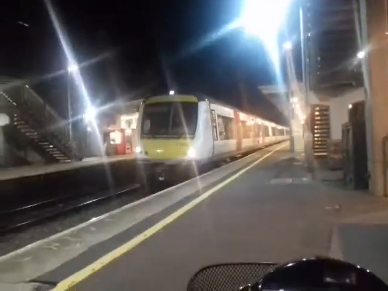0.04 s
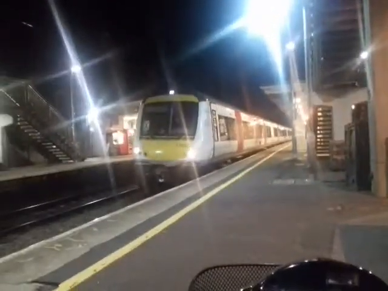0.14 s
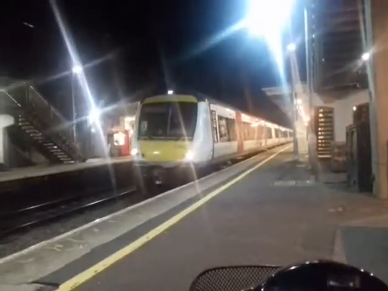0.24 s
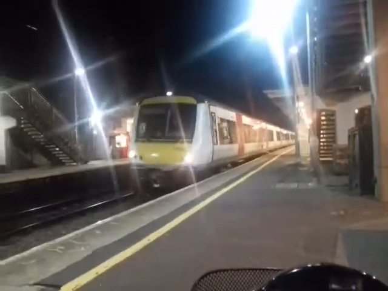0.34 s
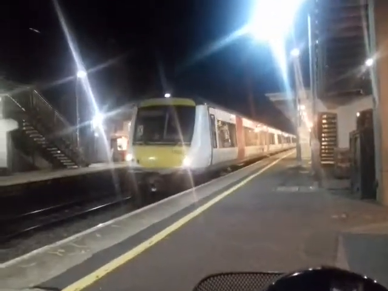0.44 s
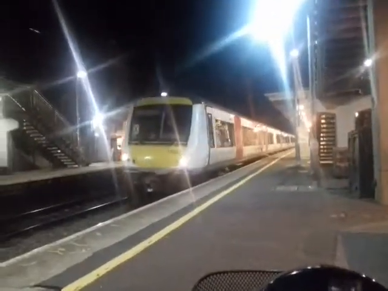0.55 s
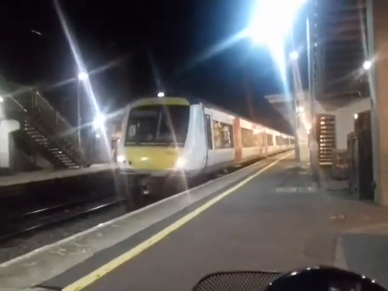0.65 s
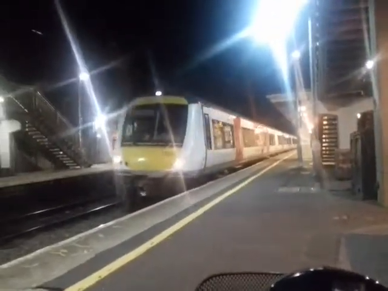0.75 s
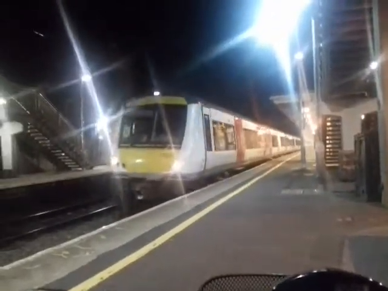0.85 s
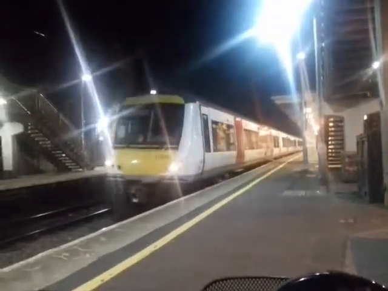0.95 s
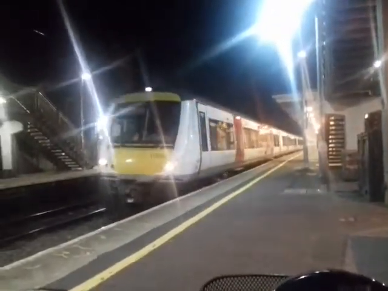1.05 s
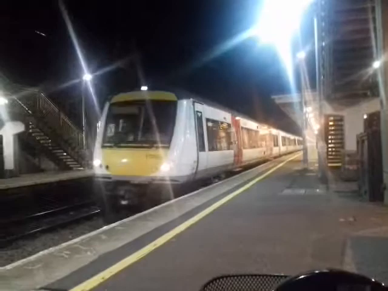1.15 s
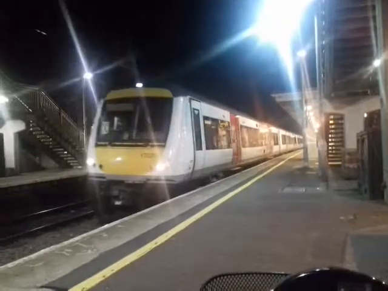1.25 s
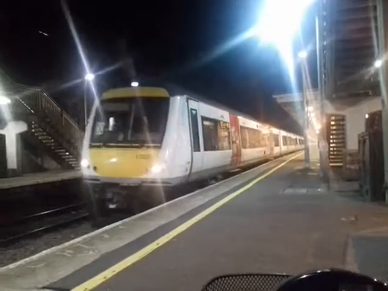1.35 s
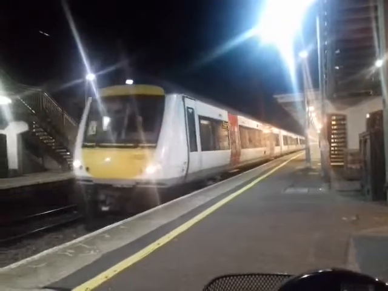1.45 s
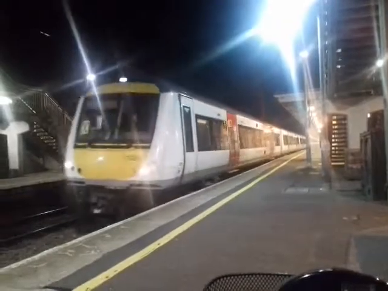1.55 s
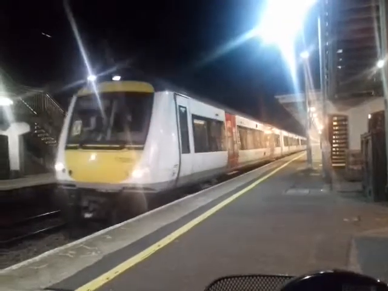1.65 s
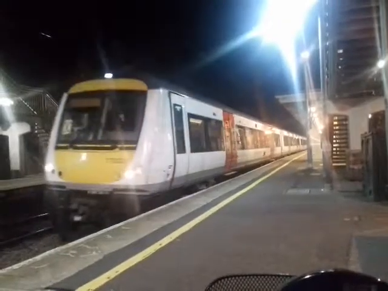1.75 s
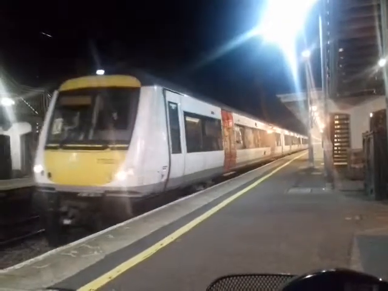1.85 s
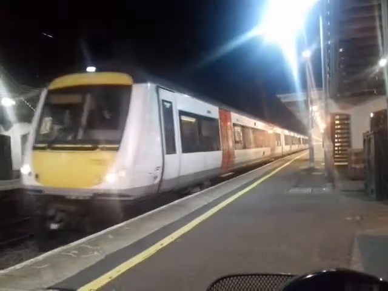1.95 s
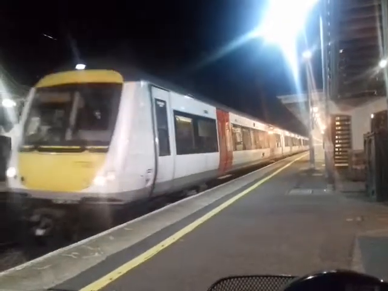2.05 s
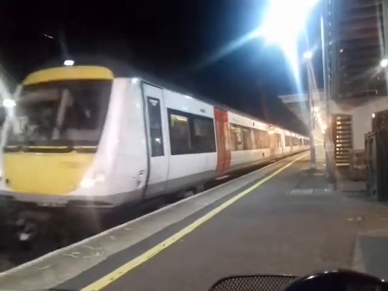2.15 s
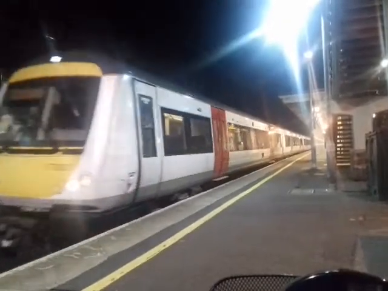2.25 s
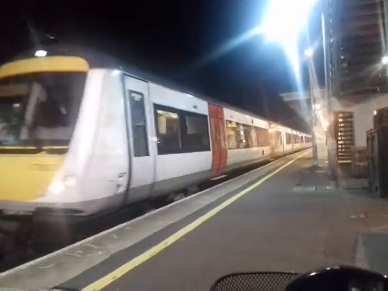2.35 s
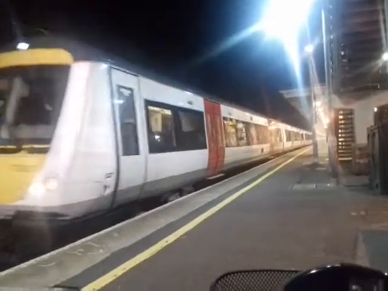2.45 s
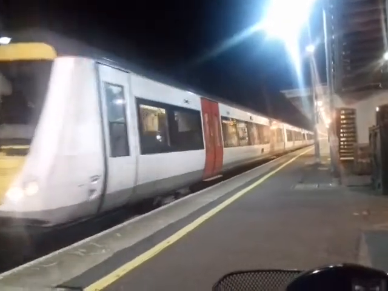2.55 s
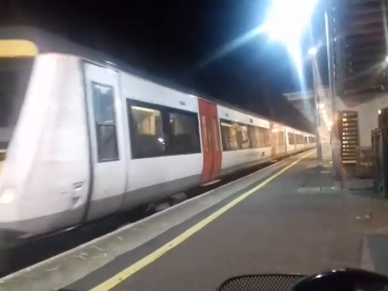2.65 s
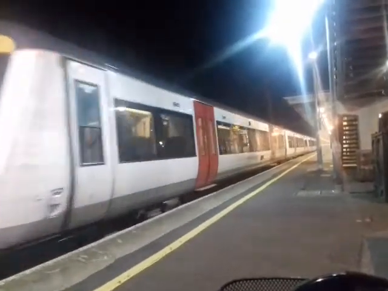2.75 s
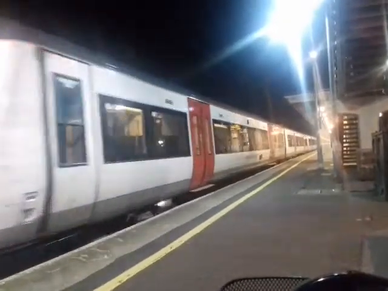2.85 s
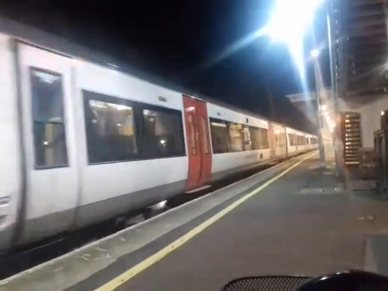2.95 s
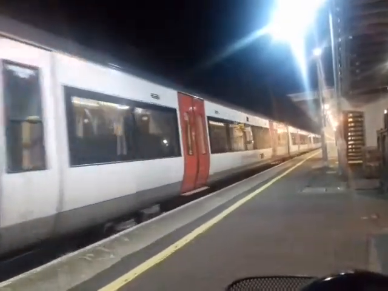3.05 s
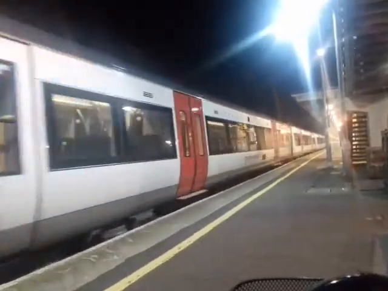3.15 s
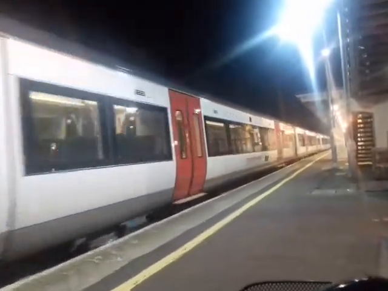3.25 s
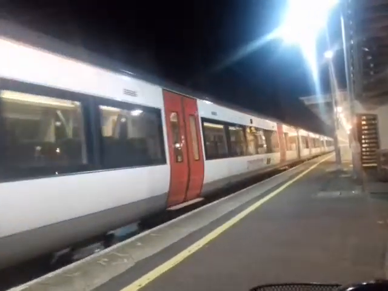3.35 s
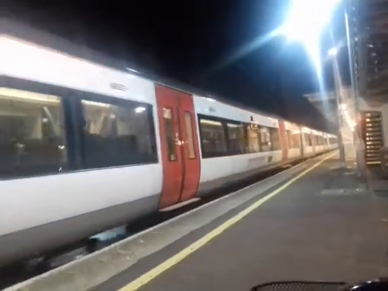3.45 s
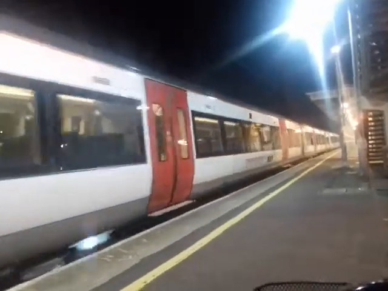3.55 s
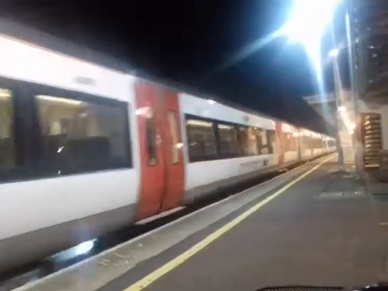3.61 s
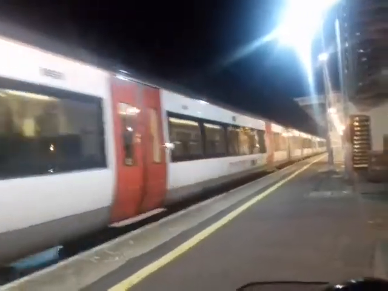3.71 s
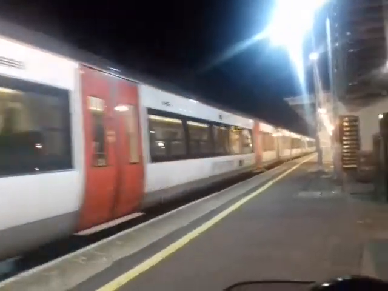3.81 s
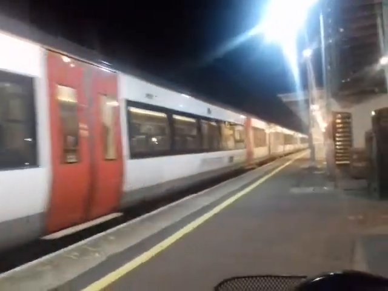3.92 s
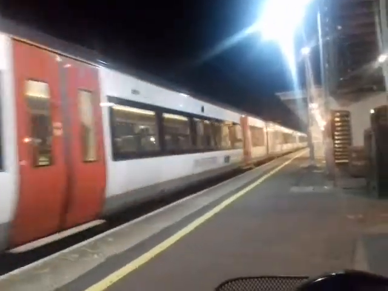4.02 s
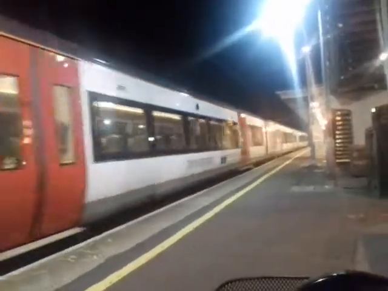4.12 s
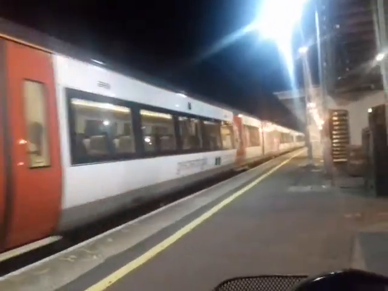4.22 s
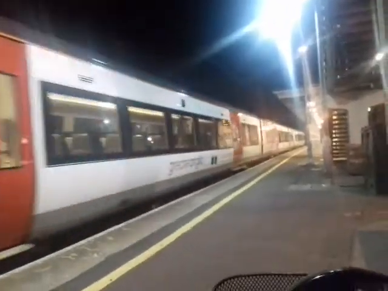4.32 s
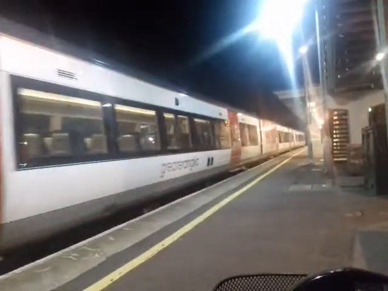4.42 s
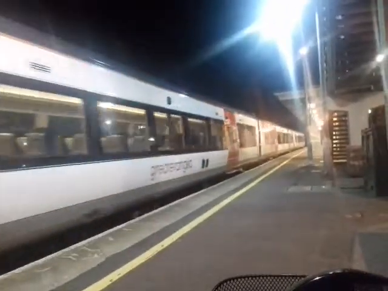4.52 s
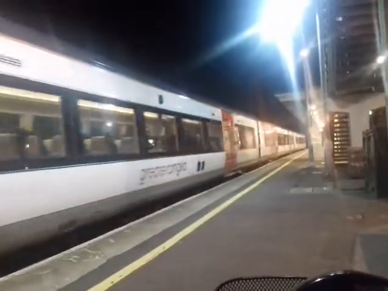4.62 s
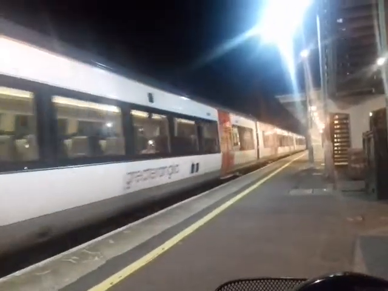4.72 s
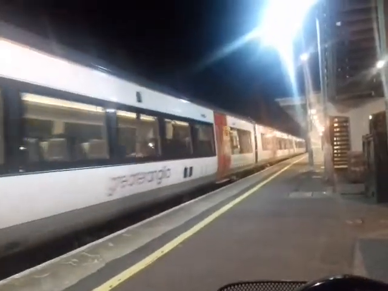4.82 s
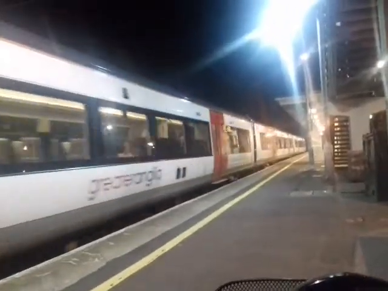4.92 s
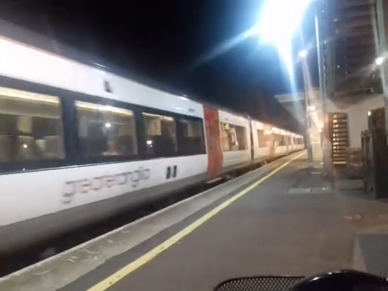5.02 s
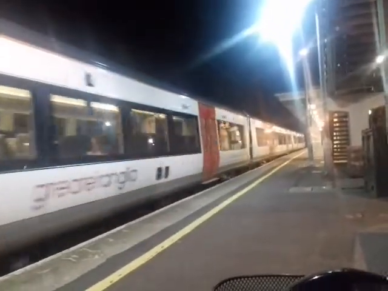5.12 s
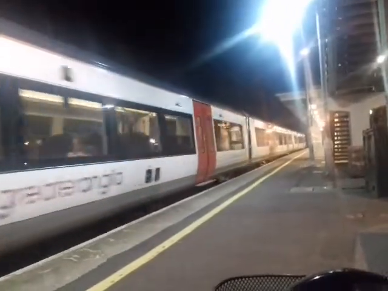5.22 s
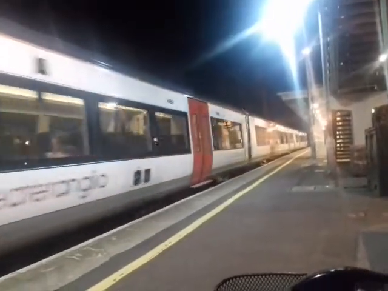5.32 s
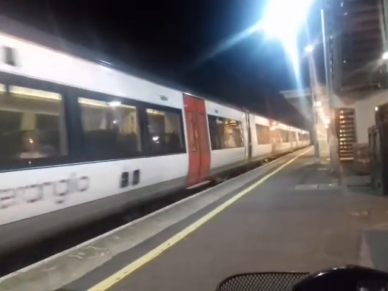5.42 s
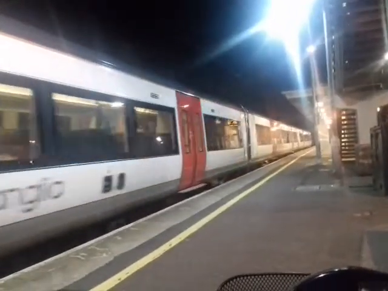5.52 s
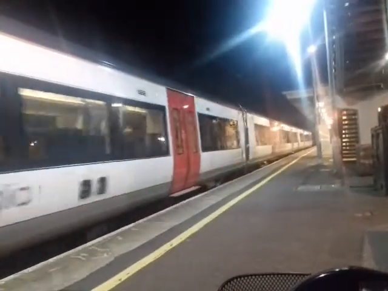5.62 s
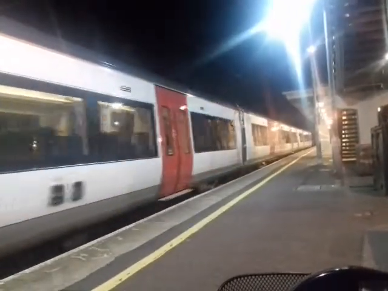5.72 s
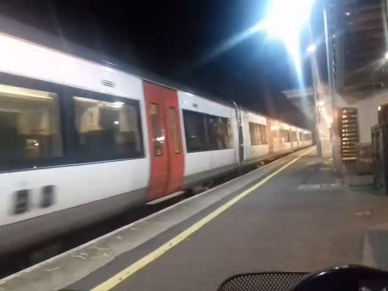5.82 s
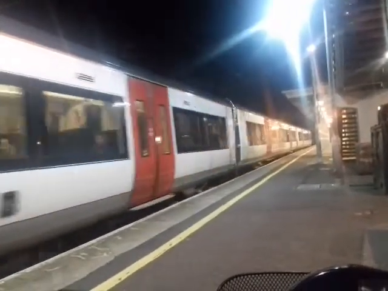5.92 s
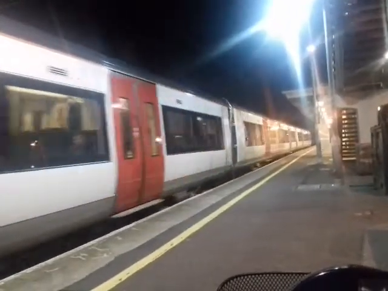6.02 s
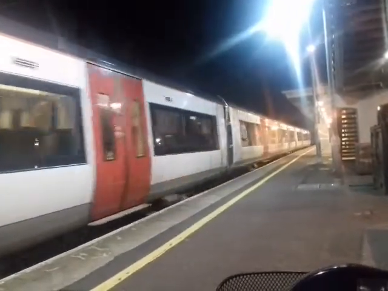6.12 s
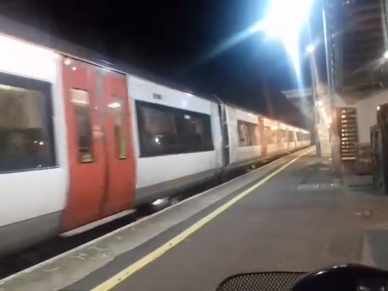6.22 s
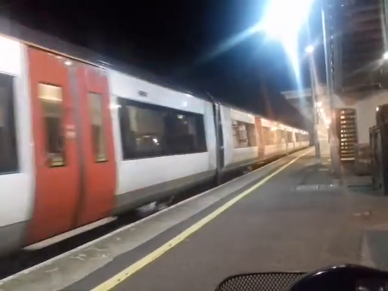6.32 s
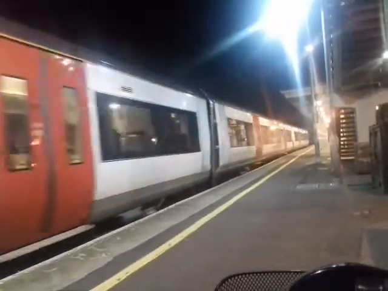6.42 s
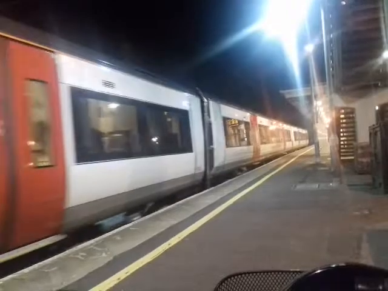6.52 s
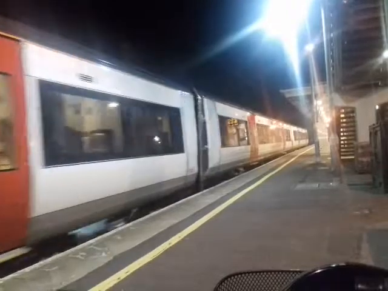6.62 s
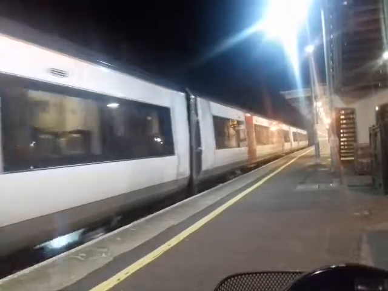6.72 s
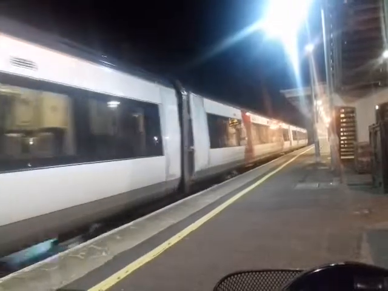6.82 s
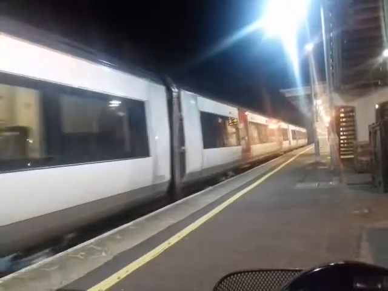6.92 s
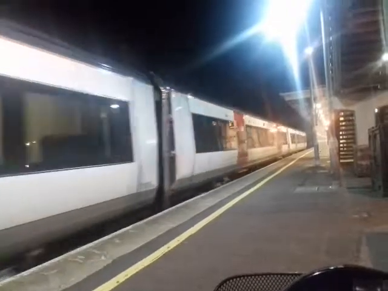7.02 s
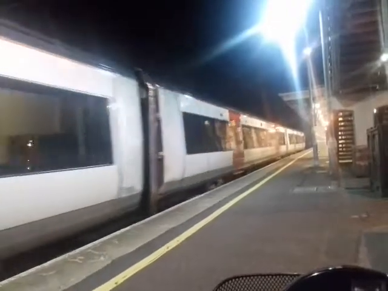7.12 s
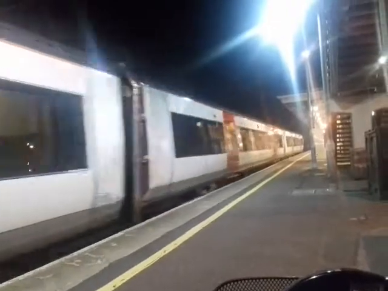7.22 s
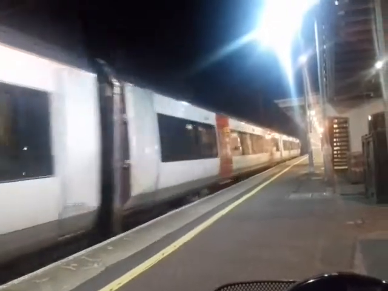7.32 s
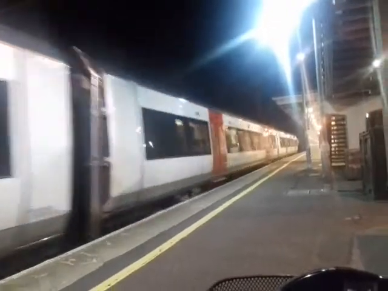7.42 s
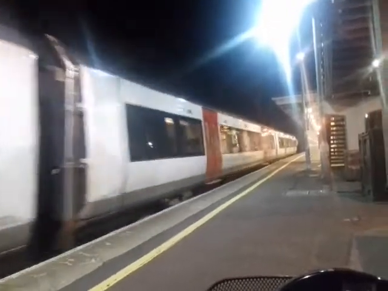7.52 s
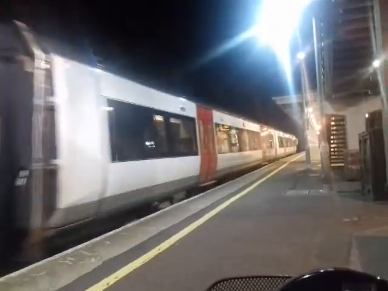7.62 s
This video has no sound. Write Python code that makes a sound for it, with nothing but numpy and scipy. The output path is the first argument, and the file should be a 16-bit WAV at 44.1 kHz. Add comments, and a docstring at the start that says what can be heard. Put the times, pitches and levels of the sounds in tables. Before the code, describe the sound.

A diesel passenger train passes close to a microphone on an open platform. From 0 s a low, wavering engine drone and distant wheel noise are heard with a bright airy hiss, which sinks, flares again around 1.3 s after two tiny ticks at about 1 s, and dies away by 2 to 3 s. From about 2.5 s a fuzzy transmission whine stands out, slowly gliding down. Rolling roar and wheel hiss thicken between 3 and 5 s as the running gear nears, and a deep fan hum swells to its fullest near 5 s. Around 6 s the exhaust boom surges in uneven pulses, and the engine comes abreast near 6.4 s, throbbing, with a thin turbo whistle above. A higher fan tone and the rear wheels' rush peak around 7.3 to 7.5 s, and the sound stops at about 7.7 s, still loud. Mono, full and rough.

```python
"""A diesel railcar train pulls out along a platform under full power, its coaches passing close by.
First come far wheel noise, engine tones, two tiny ticks and an airy hiss that sinks, flares and dies away.
Transmission and turbocharger whine as gliding tones, and running gear passes as bands of noise.
The lower fan tone swells; the six-cylinder engine draws abreast, its exhaust boom surging from about 6 s;
the upper fan tone and rear bogie peak last. Random quadrature echoes make every sustained tone waver."""
import sys
import numpy as np
from scipy import signal
from scipy.fft import rfft, irfft, next_fast_len
from scipy.io import wavfile
from scipy.ndimage import uniform_filter1d, minimum_filter1d, map_coordinates

SR = 44100
rng = np.random.default_rng(int(sys.argv[2]) if len(sys.argv) > 2 else 0)


def persist_wave(psi):
    """Save psi, clipped to +-1, as 16-bit WAV."""
    counts = np.round(np.clip(psi, -1, 1) * 32767).astype(np.int16)
    wavfile.write(sys.argv[1], SR, np.atleast_2d(counts).T)


N = 337806
TIME = np.arange(N) / SR  # s

# crankshaft speed as heard: (time [s], speed [turns/s])
SHAFT_SPEED = [(0, 24.17), (1.2, 24.25), (2.3, 24.19), (3.3, 24.12), (4.6, 24.11), (5.7, 24.06),
               (6.6, 23.94), (7.1, 23.96), (7.66, 24.02)]
# combustion rumble spectrum: (frequency [Hz], relative level [dB])
RUMBLE_SPECTRUM = [(20, -59.5), (40, -35), (65, -24.5), (100, -26), (140, 1), (230, 0.5), (340, 3.5),
                   (430, 3.5), (510, -9), (590, -27), (1000, -55.5), (4000, -120)]


def amp(db):
    """Decibels to amplitude ratio: 20 dB is a factor of ten."""
    return 10 ** (np.asarray(db) / 20)


def unit(x):
    """Normalise by the root mean square, so that the mean power is 1."""
    return x / np.sqrt(np.mean(x ** 2) + 1e-20)


def along(points, hz):
    """Interpolate (frequency, value) points on a logarithmic frequency axis."""
    f, v = np.transpose(points)
    return np.interp(np.log(hz + 1), np.log(f + 1), v)


def curves(rows):
    """Piecewise-linear motion: one value per sample for each column after the time."""
    times, *columns = np.transpose(rows)
    return [np.interp(TIME, times, column) for column in columns]


def wobble(rate):
    """Band-limited random fluctuation: a smooth curve through rate random knots a second."""
    coarse = np.linspace(0, N, 16384)
    knots = rng.standard_normal(8192)
    smooth = map_coordinates(knots, [coarse * rate / SR], mode="wrap")
    return np.interp(np.arange(N), coarse, smooth)


def filtered(x, response):
    """Linear filtering: the spectrum of x times a response of frequency."""
    padded = next_fast_len(N + SR // 4)
    spectrum = rfft(x, padded) * response(np.fft.rfftfreq(padded, 1 / SR))
    return irfft(spectrum, padded)[:N]


def noise(spectrum, patchy_db):
    """Coloured noise of rms 1, with random gain patches in time and frequency before the colouring."""
    cells = signal.stft(rng.standard_normal(N), nperseg=2048)[2]
    field = uniform_filter1d(rng.standard_normal(cells.shape), size=3, axis=0)
    field = uniform_filter1d(field, size=10, axis=1)
    patchy = signal.istft(cells * amp(patchy_db * unit(field)))[1][:N]
    return unit(filtered(patchy, lambda hz: amp(along(spectrum, hz))))


def angle(turns_per_s):
    """Phase is the time integral of angular speed."""
    return 2 * np.pi * np.cumsum(turns_per_s) / SR


def tone(phase, echo, rate):
    """Multipath interference: a direct tone plus shifting in-phase and quadrature echoes, rms about 1."""
    phase = phase + rng.uniform(0, 2 * np.pi)
    in_phase = (1 + echo * wobble(rate)) * np.cos(phase)
    quadrature = echo * wobble(rate) * np.sin(phase)
    return (in_phase + quadrature) / np.sqrt(.5 + echo ** 2)


def chord(crank, orders, echo, rate):
    """Engine orders: a four-stroke cycle of two turns sounds on half multiples of shaft speed."""
    return sum(amp(db) * tone(order * crank, echo, rate) for order, db in orders)


def gliding(rows, echo, rate):
    """Frequency modulation: a gliding tone that fast random echoes broaden into a fuzzy line."""
    hz, db = curves(rows)
    return amp(db) * tone(angle(hz), echo, rate)


def nearness(at_s, width_s):
    """Inverse-square power on a straight track: 1 abreast, a half width_s before and after."""
    return 1 / (1 + ((TIME - at_s) / width_s) ** 2)


def passing(far_db, times, near_db, width_s):
    """Power addition: gain of a steady distant sound plus sources that pass one after another."""
    near_power = sum(amp(db) ** 2 * nearness(s, width_s) for s, db in zip(times, near_db))
    return np.sqrt(amp(far_db) ** 2 + near_power)


def swells():
    """Interference: Gaussian dips and swells in dB for lower fan tone, upper fan tone and engine casing."""
    # shifting echoes briefly cancel or reinforce the tones: (time [s], half-length [s],
    # lower fan tone [dB], upper fan tone [dB], engine casing [dB])
    swell_rows = [(.5, 0.12, -1, -3, 2.5), (.72, 0.075, -12, 1, 0), (1.2, 0.19, -1.5, 0.5, -0.5),
                  (1.95, .15, 3.5, -0.5, -1), (2.7, 0.082, -6, -10, 0.5), (3.2, .2, 0, -1.5, -2.5),
                  (3.9, 0.23, 2, 0, -0.5), (4.6, 0.17, 0, 1, -2), (4.943, 0.11, -3.5, -3.5, 4),
                  (5.35, .25, 3, 2, -0.5), (5.62, 0.12, 1.5, -1, 2), (5.87, 0.045, -4, -12, -1),
                  (6.06, .05, -11, 1, -0.5), (6.718, .09, -0.5, -14, 0), (6.938, .17, -0.5, 5.5, -1)]
    return sum(np.outer(db, np.exp(-((TIME - s) / half_s) ** 2)) for s, half_s, *db in swell_rows)


def ticks():
    """Transients: short sine bursts under Gaussian envelopes, a millisecond or two long."""
    # small ticks: (time [s], level [dB], frequency [Hz])
    tick_rows = [(1.003, -41, 5960), (1.056, -37, 6300)]
    total = 0
    for s, db, hz in tick_rows:
        since = TIME - s
        total = total + amp(db) * np.exp(-(since / .0006) ** 2) * np.sin(2 * np.pi * hz * since)
    return total


def air():
    """Broadband noise: a bright airy hiss that sinks, flares once more at about 1.3 s, then dies away."""
    # course of the hiss: (time [s], level [dB])
    air_level = [(0, -36.5), (.35, -43), (1.0, -47), (1.27, -37.5), (1.7, -53), (3, -84)]
    # its spectrum: (frequency [Hz], relative level [dB])
    air_spectrum = [(1200, -61.5), (2500, -11.5), (3100, 3.5), (3800, 7.5), (4700, -7), (5600, -14.5),
                    (7200, -24), (8400, -33.5), (9400, -28), (10500, -28), (11500, -43.5), (16000, -75.5)]
    return amp(curves(air_level)[0]) * noise(air_spectrum, patchy_db=1.0)


def sizzle():
    """Phase diffusion: very fast echoes smear the faint topmost tone into a sizzle."""
    # (time [s], frequency [Hz], level [dB])
    sizzle_glide = [(0, 14200, -100), (5.6, 14100, -80), (6.4, 13840, -79), (6.8, 13820, -76),
                    (7.2, 13750, -70), (7.66, 13700, -86)]
    return gliding(sizzle_glide, echo=5, rate=700)


def whistle():
    """Phase diffusion: fast echoes roughen a thin high tone."""
    # (time [s], frequency [Hz], level [dB])
    whistle_glide = [(0, 8750, -86), (3, 8760, -72), (6.8, 8660, -72), (7.25, 8830, -58), (7.5, 9100, -61),
                     (7.66, 8900, -70)]
    return gliding(whistle_glide, echo=5, rate=480)


def turbocharger():
    """Frequency modulation: the turbocharger whistles on one gliding tone, fuzzed by fast flutter."""
    # (time [s], frequency [Hz], level [dB])
    turbo_glide = [(0, 3700, -64), (3.2, 3530, -56), (4.6, 3627, -45), (5.6, 3546, -49.5), (6.4, 3550, -38),
                   (7.1, 3400, -43), (7.66, 3420, -40)]
    return gliding(turbo_glide, echo=2.1, rate=100)


def transmission():
    """Frequency modulation: the transmission whines on one gliding tone, fuzzed by fast flutter."""
    # (time [s], frequency [Hz], level [dB])
    whine_glide = [(0, 1490, -66), (2.2, 1440, -51), (2.7, 1424, -41), (3.2, 1403, -42.5), (3.6, 1402, -40),
                   (4.4, 1420, -39.5), (5.1, 1400, -41), (6, 1372, -37.5), (6.9, 1307, -40),
                   (7.66, 1297, -47.5)]
    return gliding(whine_glide, echo=1.4, rate=80)


def rolling(throb):
    """Rolling noise: bands of noise rise as running gear passes; engine clatter modulates roar and rush."""
    # cab front, front bogie, two parts of the drive, rear bogie, before the trims below:
    # (time [s], deep rumble [dB], roar [dB], rush [dB], hiss [dB], fizz [dB])
    pass_rows = [(3.451, -43, -35, -50.5, -44.5, -69), (4.55, -41.5, -31, -40, -39.5, -60.5),
                 (5.65, -45, -30.5, -32, -34, -54), (6.27, -51, -27, -30, -34.5, -55.5),
                 (7.5, -38, -25.5, -31.5, -31.5, -53.5)]
    # spectra, all: (frequency [Hz], relative level [dB])
    deep_spectrum = [(20, -37), (38, -23.5), (60, -2.5), (80, 3), (98, -10), (130, -25), (250, -58),
                     (900, -120)]
    roar_spectrum = [(300, -23.5), (500, 5), (590, -2.5), (760, 2), (1060, 0.5), (1170, -6.5),
                     (1450, -23.5), (2000, -22.5), (3500, -60), (9000, -120)]
    rush_spectrum = [(700, -31.5), (1200, 3), (1550, 2), (2050, 0.95), (2500, -4), (3100, -5.5),
                     (4000, -18), (6000, -47.5), (12000, -120)]
    hiss_spectrum = [(2200, -22.5), (3200, -6), (3560, 1.5), (3730, 1.5), (3980, 4.5), (4350, 0),
                     (4750, -9.5), (5500, -19.5), (6500, -27), (9000, -57.5), (16000, -120)]
    fizz_spectrum = [(3500, -16.5), (5500, 8.5), (6500, 0), (7600, -1.5), (8700, -1), (9650, -4),
                     (10050, -7), (10700, -9.5), (11500, -12), (14000, -15.5), (15000, -26)]
    # the rest of the train, far down the platform, before the same trims (dB)
    far_deep_db, far_roar_db, far_rush_db, far_hiss_db, far_fizz_db = -58.5, -37, -38.5, -38.5, -61
    # time from abreast to half power (s); the treble is beamed more narrowly
    roar_width_s, hiss_width_s, fizz_width_s = 0.58, 0.48, 0.45

    times, deep_db, roar_db, rush_db, hiss_db, fizz_db = np.transpose(pass_rows)
    uneven_db = .5 * wobble(13)  # shared by all bands but the deep one

    deep = passing(far_deep_db, times, deep_db, hiss_width_s) * noise(deep_spectrum, patchy_db=1.0)
    deep *= amp(-4.5 + 1.2 * wobble(2.9))

    roar = passing(far_roar_db, times, roar_db, roar_width_s) * noise(roar_spectrum, patchy_db=2.0)
    roar *= amp(0.42 * wobble(12)) * (1 + 0.099 * throb)

    rush = passing(far_rush_db, times, rush_db, hiss_width_s) * noise(rush_spectrum, patchy_db=1.14)
    rush *= amp(1.27) * (1 + 0.027 * throb)

    hiss = passing(far_hiss_db, times, hiss_db, hiss_width_s) * noise(hiss_spectrum, patchy_db=0.6)
    hiss *= amp(-0.78 + 0.24 * wobble(11))

    fizz = passing(far_fizz_db, times, fizz_db, fizz_width_s) * noise(fizz_spectrum, patchy_db=0.5)
    fizz *= amp(1.94 + .3 * wobble(14))
    return deep + amp(uneven_db) * (roar + rush + hiss + fizz)


def fans(swell_db):
    """Blade-passing tones: harmonics of the cooling fan's rotation swell as it passes."""
    # cooling fan: (time [s], speed [turns/s])
    fan_speed = [(0, 27.5), (1.5, 27.45), (3.2, 27.42), (4.2, 27.25), (5.3, 27.13), (6.2, 27.22),
                 (7.66, 27.3)]
    # the two strong tones: (multiple of fan speed, time when loudest [s], width of the swell [s],
    # level there before echo swells [dB], fall-off per tenfold distance [dB])
    strong_tones = [(6, 5.03, 2.35, -21.5, 25.5), (9, 7.28, 2.52, -17, 35.5)]
    # weaker tones: (multiple of fan speed, level relative to the sixth before echo swells [dB])
    weak_tones = [(3, -33.5), (4, -21.5), (5, -18), (10, -13.5), (12, -25)]

    rotor = angle(curves(fan_speed)[0])
    lower, upper = [order * rotor for order, *_ in strong_tones]
    # nearness goes as distance squared, inverted, hence half the fall-off
    pass_db = np.array([db + fall_db / 2 * np.log10(nearness(s, width_s))
                        for _, s, width_s, db, fall_db in strong_tones])
    lower_db, upper_db = pass_db + swell_db

    strong = amp(lower_db) * tone(lower, echo=0.29, rate=8) + amp(upper_db) * tone(upper, echo=.29, rate=8)
    weak = sum(amp(db) * tone(order * rotor, echo=1.0, rate=5) for order, db in weak_tones)
    return strong + amp(pass_db[0]) * weak


def clatter(crank):
    """Amplitude modulation: the engine's pulsation as a sum of shaft harmonics."""
    return np.cos(3 * crank) + .6 * np.cos(crank) + .7 * np.cos(5 * crank) + .6 * np.cos(6 * crank)


def uneven_firing(crank, count=64):
    """Fourier series: unequal cylinders repeat every two turns and fill in all the half orders."""
    orders = np.arange(count + 1) / 2
    order_hz = orders * np.mean(curves(SHAFT_SPEED)[0])
    sizes = amp(along(RUMBLE_SPECTRUM, order_hz)) * (orders > 0)
    cycle = irfft(sizes * np.exp(2j * np.pi * rng.random(count + 1)), 4096)
    cycle_angle = np.linspace(0, 2 * np.pi, len(cycle), endpoint=False)
    return unit(np.interp(crank / 2, cycle_angle, cycle, period=2 * np.pi))


def engines(crank, throb, swell_db):
    """Harmonic radiation and beating: near engine, the next coach's slightly sharp one, and rumble."""
    # strong tones of the casing: (multiple of shaft speed, relative level [dB])
    casing_orders = [(2.5, -31.5), (3.5, -31), (4.5, -22.5), (5, -17), (6, -8), (7.5, -12.5), (8, -14),
                     (9.5, -12.5), (11, -8), (12.5, -14.5), (14, -3.5), (15, -2.5), (16, -18.5), (17, -6),
                     (18, -17), (20, -14), (21, -21.5), (23, -21.5)]
    # upper tones that escape sideways from under the coach: (multiple of shaft speed, relative level [dB])
    side_orders = [(26, -1), (27, -6.5), (28, -3), (29, -4), (32, 0.5), (36, -5.5), (45, -3.5)]
    # course of those upper tones: (time [s], level [dB])
    side_level = [(0, -46), (2.3, -50), (3.9, -39.5), (4.8, -37), (5.8, -44), (6.8, -36.5), (7.66, -39)]
    # casing gain far off and added abreast (dB), when it passes and how long it takes (s)
    far_db, near_db, engine_at_s, engine_width_s = -28, -23, 6.36, 1.49
    # relative to the casing gain: tones far off and their rise on approach (dB)
    tones_db, tones_rise_db = -1.1, 1
    # relative to the casing gain: uneven firing of this and the next engine, and rumble (dB)
    beat_db, next_engine_db, rumble_db = -12, -12, -3.5

    casing = passing(far_db, [engine_at_s], [near_db], engine_width_s) * amp(swell_db + 0.93 * wobble(9))
    growl = amp(tones_db + tones_rise_db * nearness(engine_at_s, engine_width_s))
    tones = growl * chord(crank, casing_orders, echo=0.48, rate=6)
    sharp = 1.005  # speed ratio of the next coach's engine
    beat = amp(beat_db) * uneven_firing(crank) + amp(next_engine_db) * uneven_firing(crank * sharp)
    rumble = amp(rumble_db) * noise(RUMBLE_SPECTRUM, patchy_db=1) * (1 + .25 * throb)
    side = amp(curves(side_level)[0]) * chord(crank, side_orders, echo=.8, rate=9)
    return casing * (tones + beat + rumble) + side


def exhaust(crank):
    """Pulse harmonics: three firings a turn; the pipe favours the third and fourth harmonics."""
    # drone at 3 times the firing rate: (time [s], level before trim [dB])
    drone_level = [(0.0, -28), (1.33, -28), (2.85, -22), (3.46, -23), (3.94, -25), (4.1, -27),
                   (4.29, -22.5), (4.59, -19.5), (4.7, -25.5), (5.57, -20.5), (5.9, -35.5), (6.32, -21),
                   (6.74, -25), (6.86, -17), (7.54, -16.5), (7.66, -29)]
    # boom at 4 times the firing rate: (time [s], level before trim [dB])
    boom_level = [(0.0, -27), (0.36, -34), (1.61, -20), (2.01, -34.3), (2.24, -21.5), (2.79, -28),
                  (3.0, -24.5), (3.06, -34), (3.58, -17.5), (3.7, -35), (3.78, -19.5), (5.36, -26),
                  (6.02, -9.5), (6.17, -18), (6.27, -12), (6.77, -10.5), (6.95, -21.5), (7.66, -10)]
    # firing thud far off and added abreast of the outlet (dB), when that passes and how long it takes (s)
    far_db, near_db, outlet_at_s, outlet_width_s = -62, -35, 7.3, 0.29

    firing = 3 * crank
    thud_gain = passing(far_db, [outlet_at_s], [near_db], outlet_width_s)
    thud = thud_gain * tone(firing, echo=0.27, rate=5.5)
    drone = amp(curves(drone_level)[0] - 0.4) * tone(3 * firing, echo=0.16, rate=8.8)
    boom = amp(curves(boom_level)[0] + 0.18) * tone(4 * firing, echo=0.15, rate=8)
    return thud + drone + boom


def scene():
    """Superposition: everything heard from the platform, summed as one channel."""
    crank = angle(curves(SHAFT_SPEED)[0])
    throb = clatter(crank)
    *fan_db, casing_db = swells()
    background = ticks() + air() + sizzle() + whistle()
    machinery = turbocharger() + transmission() + rolling(throb) + fans(fan_db)
    power = engines(crank, throb, casing_db) + exhaust(crank)
    return (background + machinery + power)[None]


def record(dry):
    """Limiting and band-limiting: peaks are held, ends softened, deepest bass and top treble removed."""
    low_cut_hz, top_hz = 46, 15650  # the microphone loses the deepest bass below the low cut
    needed = np.minimum(1, .9 / (np.abs(dry) + 1e-9))
    gain = uniform_filter1d(minimum_filter1d(needed, size=600), size=600)
    ends = signal.windows.tukey(N, .001)

    def passband(hz):
        """Third-order high-pass magnitude with a sharp upper limit."""
        return (hz < top_hz) * hz ** 3 / np.hypot(hz ** 3, low_cut_hz ** 3)

    return filtered((dry * gain)[0] * ends, passband)[None]


dry = scene()
out = record(dry)
persist_wave(out)
```